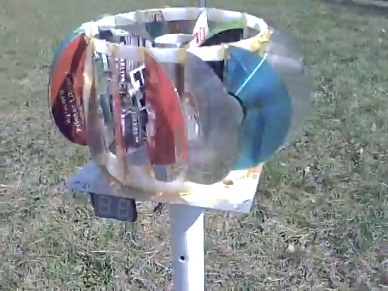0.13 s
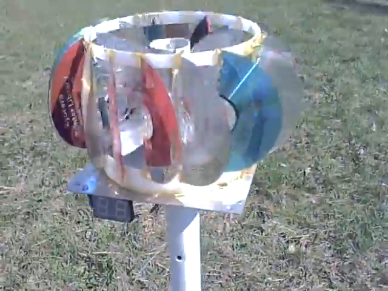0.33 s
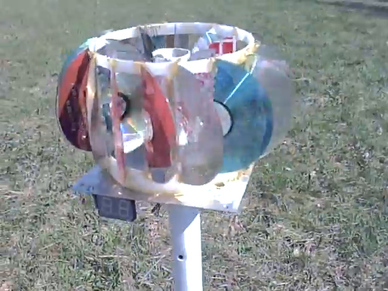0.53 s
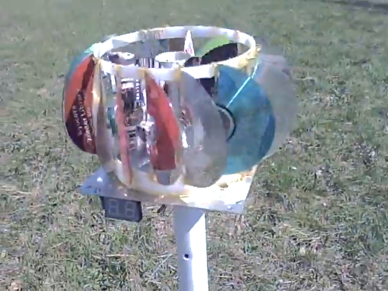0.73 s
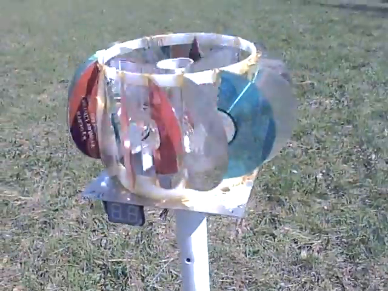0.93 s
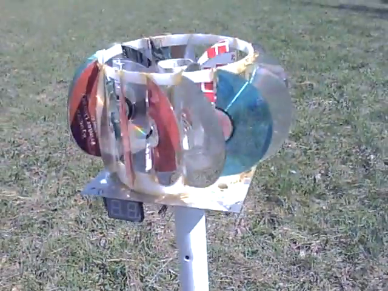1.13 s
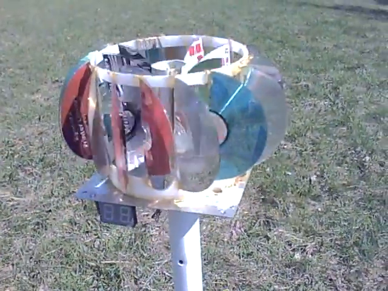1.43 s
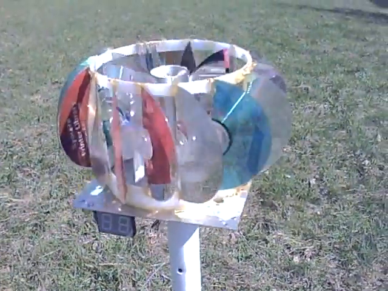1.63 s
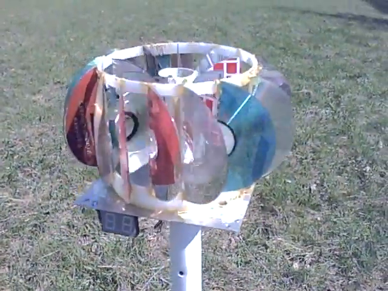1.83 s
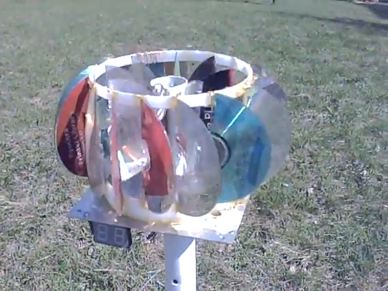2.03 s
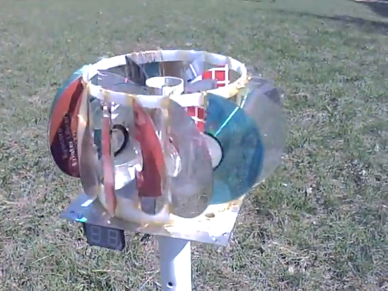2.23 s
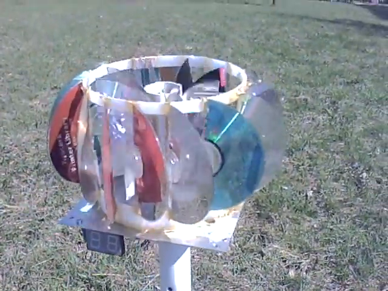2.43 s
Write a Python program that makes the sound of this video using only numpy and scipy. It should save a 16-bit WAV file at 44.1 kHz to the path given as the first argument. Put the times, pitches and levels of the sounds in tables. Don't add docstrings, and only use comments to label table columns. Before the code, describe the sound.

Gusty wind buffets a small microphone in an open field, with low rumble, thuds and crackling pops.

```python
import sys
import numpy as np
from scipy import signal
from scipy.fft import rfft, irfft, next_fast_len
from scipy.io import wavfile
from scipy.ndimage import uniform_filter1d, map_coordinates

SR = 44100
rng = np.random.default_rng(int(sys.argv[2]) if len(sys.argv) > 2 else 0)


def invert_db(level):
    return 10 ** (np.asarray(level, dtype=float) / 20)


def persist_wave(psi):
    counts = np.round(np.clip(psi, -1, 1) * 32767).astype(np.int16)
    wavfile.write(sys.argv[1], SR, np.atleast_2d(counts).T)


N = 114660

# (time [s], strength [dB])
WIND_STRENGTH = [(0, -35.5), (.1, -25), (.18, -32), (.32, -34), (.45, -34.5), (.62, -33), (.8, -34.5),
                 (1.0, -33.5), (1.13, -28), (1.3, -34), (1.45, -32.5), (1.6, -44), (1.76, -32.5),
                 (1.95, -34.5), (2.2, -31), (2.31, -43.5), (2.45, -24.5), (2.6, -31)]
# (frequency [Hz], level [dB per Hz])
RUMBLE_TONE = [(12, -18.5), (25, -1), (60, -5.5), (120, -3), (200, -10.5), (400, -34.5), (900, -61.5),
               (2000, -120)]
# (time [s], peak [dB], pitch [Hz], length [cycles])
PUSHING_EDDIES = [(.006, -21.5, 72, 0.77), (.023, -22.5, 59.4, 0.63), (0.041, -17.5, 111, 0.58),
                  (.078, -20.5, 130, 0.47), (.383, -41.5, 69.6, 1.1), (.439, -24.5, 110, 0.59),
                  (.527, -24.5, 98.6, 0.88), (.269, -27, 330, 1.44), (.713, -26, 150, 1),
                  (.7265, -22.5, 230, 1.4), (.869, -27.5, 60, .8), (.971, -28.5, 70, 0.9),
                  (1.425, -26.5, 50, .9), (1.551, -32, 40, 0.89), (1.115, -22.5, 60, 0.41),
                  (2.173, -23.5, 70, 0.42), (0.066, -15, 81.5, 0.78), (0.104, -22, 65.3, 0.66),
                  (0.189, -31, 60, 1.9), (0.502, -30.5, 60, 0.78), (0.749, -21.5, 70.5, 0.75),
                  (1.215, -16, 84, 0.46), (1.271, -21, 86, 0.68), (1.33, -22.5, 80.4, 0.61),
                  (1.48, -30.5, 95, 2.5), (1.652, -35, 60, 1.5), (1.752, -27.5, 25.3, 1.3),
                  (2.038, -29.5, 131, 2), (2.154, -39, 101, 1.9), (2.251, -28.5, 55.5, 1.55),
                  (2.412, -22.5, 46.6, 0.68), (2.49, -22.5, 40, 1.4), (2.58, -15.5, 35, 0.69)]
# (time [s], peak [dB], pitch [Hz], length [cycles])
PULLING_EDDIES = [(.108, -18, 70, 0.39), (.12, -25.5, 35.2, 0.65), (.57, -21, 111.6, 0.85),
                  (.641, -32, 90, 2), (.69, -29.5, 30, 0.76), (.905, -26.5, 70, 0.53),
                  (1.077, -23, 91, 1.56), (1.141, -19.5, 59.7, 0.52), (1.379, -35, 70, 0.61),
                  (1.729, -27, 51.7, 1.16), (1.885, -26, 69, 1), (1.913, -35, 100, 0.77),
                  (1.956, -28.5, 59.4, 1.8), (2.0, -28, 134, 1.2), (2.228, -31, 70.8, 0.59),
                  (2.392, -25, 60, 0.55), (2.465, -20, 30, 0.64), (2.543, -24, 54.4, 0.63)]
# (centre [s], length [s], level [dB], eddy pitch [Hz])
EDDY_PUFFS = [(.006, 0.024, -29.5, 430), (0.043, 0.015, -30, 507), (0.085, 0.022, -31, 440),
              (0.2, 0.08, -32, 398), (0.27, 0.022, -32.5, 340), (0.342, 0.012, -36.5, 544),
              (0.378, 0.043, -27.5, 300), (0.458, 0.13, -34.5, 350), (0.534, 0.11, -32, 345),
              (0.618, 0.027, -42.5, 392), (0.679, 0.037, -31.5, 320), (0.728, 0.047, -26, 300),
              (0.826, 0.095, -33.5, 350), (0.867, .02, -33, 332), (0.849, 0.032, -28.5, 344),
              (0.917, 0.033, -28.5, 316), (0.963, .03, -29.5, 300), (1, 0.14, -30, 274),
              (1.134, 0.024, -33.5, 282), (1.174, 0.034, -35.5, 675), (1.208, 0.018, -35, 800),
              (1.257, 0.059, -27, 200), (1.682, 0.027, -45, 746), (1.71, 0.025, -37.5, 540),
              (1.734, 0.0076, -35, 192), (1.878, 0.031, -44, 262), (1.947, 0.066, -43, 420),
              (2.059, 0.058, -44, 387), (2.139, 0.023, -32, 244), (2.435, 0.2, -38.5, 300),
              (2.475, 0.042, -29.5, 530), (2.518, 0.013, -35.5, 535), (2.541, 0.015, -31.5, 395),
              (2.576, 0.031, -31.5, 259)]
# (frequency [Hz], level [dB per Hz])
FIZZ_TONE = [(300, -37.5), (700, -6), (1400, 6.5), (2200, -7.5), (3500, -22.5), (6000, -33.5), (8000, -120)]
# (time [s], peak [dB], width [ms])
MEMBRANE_POPS = [(.007, -15, 0.69), (0.0261, -15, 0.58), (0.049, -20.5, 0.43), (.058, -22.5, 0.34),
                 (0.07, -21.5, 1.2), (0.21, -26, 1), (0.339, -30, 0.34), (.3705, -29, 0.94),
                 (.378, -24, 0.26), (.405, -24, 0.29), (0.502, -24.5, 0.66), (.515, -25, 1.7),
                 (.532, -25, 1.1), (0.544, -23, 1.2), (.556, -22.5, 0.48), (.806, -26, .4),
                 (.848, -18.5, 0.68), (0.917, -15, 0.63), (.956, -14.5, 0.9), (1.023, -24, 0.52),
                 (1.031, -18, 0.95), (1.086, -19.5, .7), (1.117, -17, 0.72), (1.166, -32, 0.5),
                 (1.176, -27, 0.57), (1.184, -28, 0.65), (1.224, -20.5, 0.87), (1.234, -20, .8),
                 (1.254, -18, 0.77), (1.697, -27, 0.36), (2.415, -25, 0.3), (2.467, -19, 0.46),
                 (2.507, -22, 1.1), (.218, -20.5, 0.33), (0.2685, -19.5, 0.45), (0.2729, -21, 1.3),
                 (0.3871, -22, 1.2), (.589, -22, 0.33), (1.142, -26, 0.24), (1.263, -18, 1.4),
                 (1.984, -33, 0.33), (2.377, -31.5, 0.3), (2.5679, -20.5, 0.76), (0.7216, -20, 1.8),
                 (0.7336, -16, 0.73), (0.883, -17.5, 0.39), (0.906, -18, 0.59), (0.938, -19, 1.4),
                 (0.968, -21, 0.89), (1.713, -25, 0.35), (1.941, -22, 0.4), (2.019, -27, 0.26),
                 (2.036, -28, 0.24), (2.059, -24, 0.27), (2.445, -8.5, 0.53), (2.4842, -12, 0.37),
                 (2.504, -26.5, 0.19), (2.585, -14, 0.74)]
# (time [s], peak [dB])
HOUSING_TICKS = [(0.0238, -40.5), (0.2165, -50), (0.2663, -53), (0.5171, -49), (0.5886, -54), (.5, -55.5),
                 (0.41, -51.5), (0.724, -45.5), (.733, -46.5), (0.7199, -46), (0.827, -48), (0.8836, -58),
                 (0.9065, -41.5), (0.9186, -47), (0.9252, -44.5), (0.965, -47), (1.1734, -43.5),
                 (1.207, -47), (1.2214, -52.5), (1.2354, -67), (1.2474, -72), (1.259, -63.5), (1.6308, -61),
                 (1.9238, -48), (2.0183, -56), (2.0682, -50), (2.444, -39), (2.4638, -56), (2.468, -46),
                 (2.48, -39.5), (2.5046, -50),
                 (.6142, -39),
    (.7593, -35.5),
]
# (frequency [Hz], level [dB])
TICK_TONE = [(800, -54.5), (2000, 0), (4000, -5.5), (6500, 1), (7600, -26), (8000, -120)]
# (frequency [Hz], level [dB per Hz])
FAR_TONE = [(150, -23), (400, -3.5), (800, -0.5), (1050, -7), (1350, -2.5), (1900, -16), (2600, -30),
            (4000, -120)]
# (time [s], level [dB])
FAR_SWELLING = [
    (0, 6),
    (.5, 2),
    (1.1, 1.5),
    (1.5, -2.5),
    (1.85, 3.5),
    (2.15, 2),
    (2.35, 0),
    (2.6, 0.5),
]
# (frequency [Hz], level [dB per Hz])
GRIT_TONE = [(300, -31), (1500, 6), (3000, 0), (6200, -3), (7000, -5.5), (7500, -6), (7900, -44),
             (8500, -120)]
# (frequency [Hz], level [dB])
RECORDER_BAND = [(10, 0), (6800, 0), (7600, -14), (7850, -70), (8200, -120)]


def unit(x):
    return x / np.sqrt(np.mean(x ** 2) + 1e-20)


def coloured(x, points):
    size = next_fast_len(N + 8192)
    hz, db = np.transpose(points)
    bins_hz = np.fft.rfftfreq(size, 1 / SR)
    gain = invert_db(np.interp(np.log(bins_hz + 1), np.log(hz + 1), db))
    return irfft(rfft(x, size) * gain, size)[:N]


def wobble(rate):
    knots = rng.standard_normal(2000)
    return map_coordinates(knots, [np.clip(np.arange(N) * rate / SR, 0, 1999)])


def patchy(points, patchy_db):
    z = signal.stft(rng.standard_normal(N), nperseg=512)[2]
    field = uniform_filter1d(rng.standard_normal(z.shape), 5, 0)
    field = uniform_filter1d(field, 8, 1)
    noise = signal.istft(z * invert_db(patchy_db * unit(field)), nperseg=512)[1][:N]
    return unit(coloured(noise, points))


def dips(s, size, width_s, shape):
    lead, reach = 300, 800
    at = np.round(s * SR).astype(int)[:, None] + np.arange(reach)
    turns = ((at - lead) / SR - s[:, None]) / width_s[:, None]
    wave = size[:, None] * shape(turns)
    return np.bincount(at.ravel(), wave.ravel(), N + reach)[lead:N + lead]


def bump(u):
    return np.exp(-u * u)


def strength():
    s, db = np.transpose(WIND_STRENGTH)
    return np.interp(np.arange(N) / SR, s, db)


def rumble(wind_db):
    rumble_db, lumps_db, lumps_per_s = -3.5, 1.5, 21
    lumps = invert_db(lumps_db * wobble(lumps_per_s))
    return invert_db(wind_db + rumble_db) * unit(lumps * patchy(RUMBLE_TONE, patchy_db=1))


def thuds(rows):
    s, db, hz, cycles = np.array(rows).T[:, :, None]
    turns = (np.arange(N) / SR - s) * hz
    swell = np.exp(-(2 * turns / cycles) ** 2 / 2)
    return (invert_db(db) * np.cos(2 * np.pi * turns) * swell).sum(0)


def puffing(s, wind_db):
    between_db, between_hz = -9, 230
    centre, length, db, hz = np.transpose(EDDY_PUFFS)
    power = invert_db(2 * db) * np.exp(-(2 * (s[:, None] - centre) / length) ** 2)
    rest = invert_db(2 * (wind_db[(s * SR).astype(int)] + between_db))
    total = power.sum(1) + rest
    return total, (power @ hz + rest * between_hz) / total


def eddy_shape(u):
    return (1 - u * u) * np.exp(-u * u / 2)


def flutter(wind_db):
    count, eddies_per_s = 2600, 900
    pitch_spread, size_spread_db = 0.48, 3.5
    suck_share = 0.612
    size_fall = 0.18
    s = (np.arange(count) + rng.random(count)) / eddies_per_s
    luck = rng.standard_normal((count, 2))
    suck = rng.random(count)
    keep = s < N / SR
    s, (pitch, size), suck = s[keep], luck[keep].T, suck[keep]
    power, hz = puffing(s, wind_db)
    quick = np.exp(pitch_spread * 1.87 * np.tanh(pitch / 1.8))
    direction = np.tanh(8 * (suck - suck_share))
    spread = invert_db(size_spread_db * np.minimum(size, 1.3))
    size = direction * spread * np.sqrt(power * hz / eddies_per_s) * 1.44
    width_s = 0.23 / np.clip(hz * quick, 110, 3000)
    return dips(s, size * quick ** -size_fall, width_s, eddy_shape)


def fizz(wind_db):
    fizz_db, db_per_octave, ref_hz, grain_db = -26, 18, 350, 4
    s = np.arange(0, N, 64) / SR
    power, hz = puffing(s, wind_db)
    level = np.sqrt(power) * invert_db(fizz_db + db_per_octave * np.log2(hz / ref_hz))
    grainy = invert_db(grain_db * wobble(180)) * rng.standard_normal(N)
    return np.interp(np.arange(N) / SR, s, level) * unit(coloured(grainy, FIZZ_TONE))


def pop_shape(u):
    rebound, later = 0.45, 2.4
    suck = np.exp(-(u * u + 0.044) ** 0.94)
    return rebound * np.exp(-((u - later) / 2.46) ** 2) - suck


def pops():
    s, db, ms = np.transpose(MEMBRANE_POPS)
    return dips(s, invert_db(db), ms / 1000, pop_shape)


def ticks():
    tick_ms, tick_db, snap = 0.2, -8, 7
    s, db = np.transpose(HOUSING_TICKS)
    s = s + 0.0019
    size = invert_db(db + tick_db)
    width_s = np.full(len(s), tick_ms / 1000)
    breath = dips(s, size, width_s, bump) * unit(coloured(rng.standard_normal(N), TICK_TONE))
    return breath - coloured(dips(s, snap * size, width_s / 20, bump), TICK_TONE)


def far_roar(wind_db):
    far_db = -53
    swell_db = np.interp(np.arange(N) / SR, *np.transpose(FAR_SWELLING)) + 0.5 * wobble(20.0)
    return invert_db(far_db + swell_db) * patchy(FAR_TONE, patchy_db=1.2)


def scene():
    wind_db = strength()
    mix = rumble(wind_db) + thuds(PUSHING_EDDIES) - thuds(PULLING_EDDIES)
    mix = mix + flutter(wind_db) + fizz(wind_db)
    mix = mix + pops() + ticks() + far_roar(wind_db)
    return mix[None]


def recorder_grit(wave):
    floor_db, grit_db, hold_ms, ref_hz, grain_db = -75, -38.5, 0.68, 300, 1.5
    slope = np.gradient(wave) * SR / (2 * np.pi * ref_hz)
    window = np.exp(-np.arange(600) / (hold_ms * SR / 1000))
    power = signal.fftconvolve(slope ** 2, window / window.sum())[:N]
    steep = np.sqrt(np.abs(power)) * invert_db(grain_db * wobble(220))
    return (invert_db(floor_db) + invert_db(grit_db) * steep) * unit(coloured(rng.standard_normal(N), GRIT_TONE))


def low_pass(x):
    return signal.sosfilt(signal.butter(12, 7750, fs=SR, output="sos"), x)


def record(dry):
    fade_ms = 4
    left = (N - np.arange(N)) / (fade_ms * SR / 1000)
    fade = np.sin(np.pi / 2 * np.clip(left, 0, 1))
    mix = coloured((dry[0] + recorder_grit(dry[0])) * fade, RECORDER_BAND)[None]
    return low_pass(mix)


dry = scene()
out = record(dry)
persist_wave(out)
```